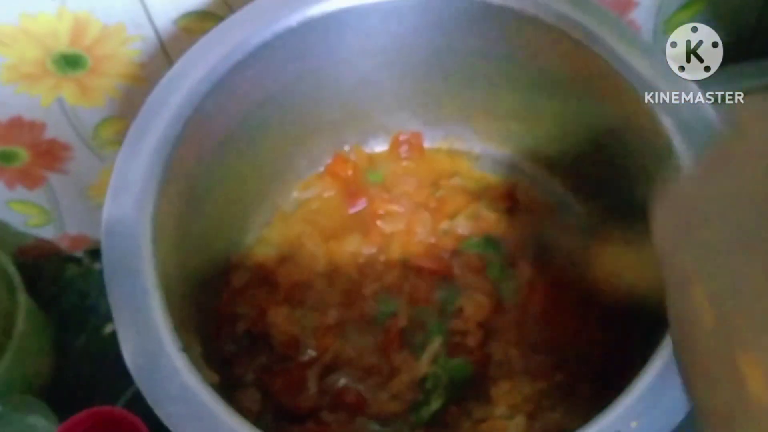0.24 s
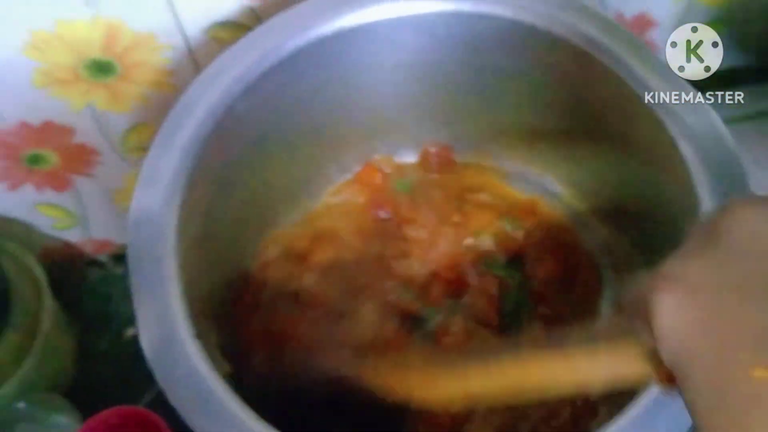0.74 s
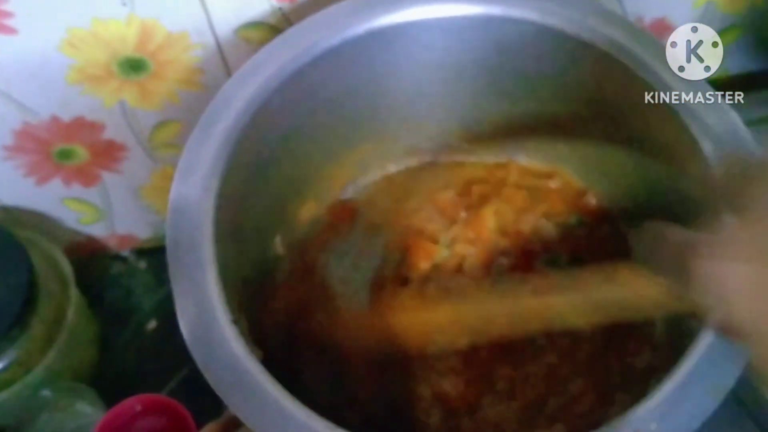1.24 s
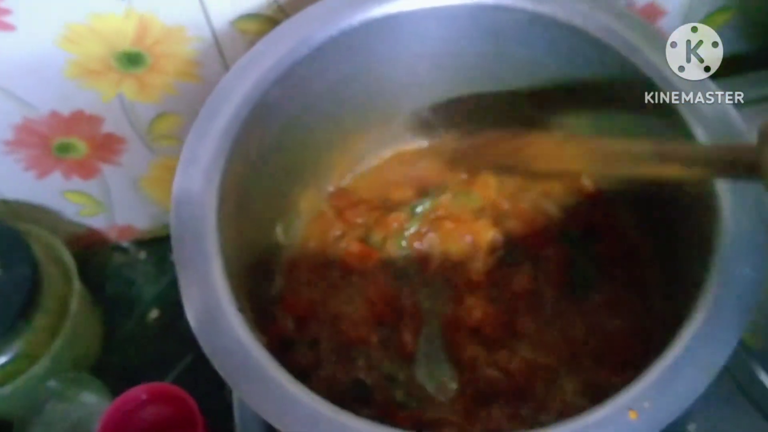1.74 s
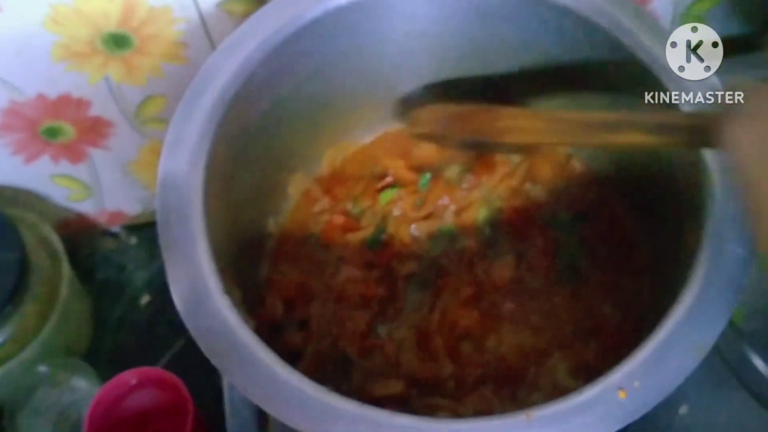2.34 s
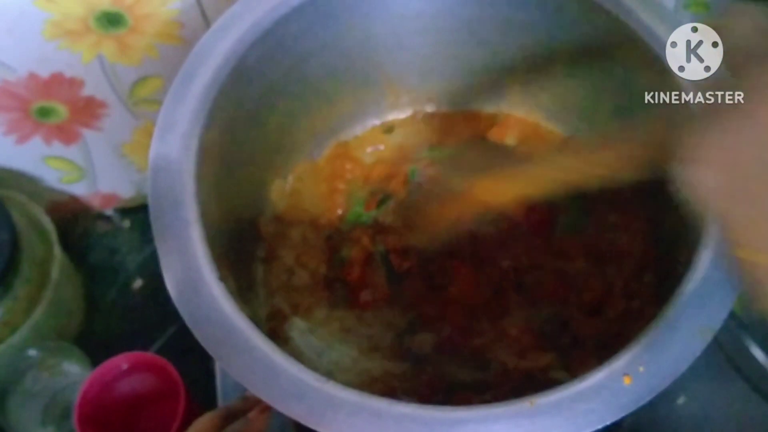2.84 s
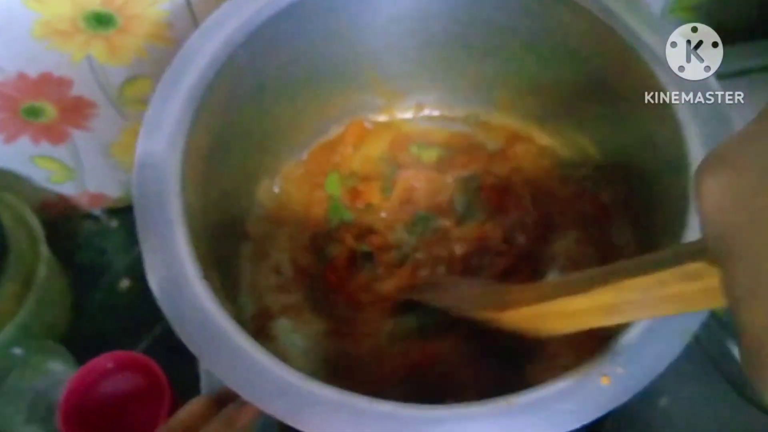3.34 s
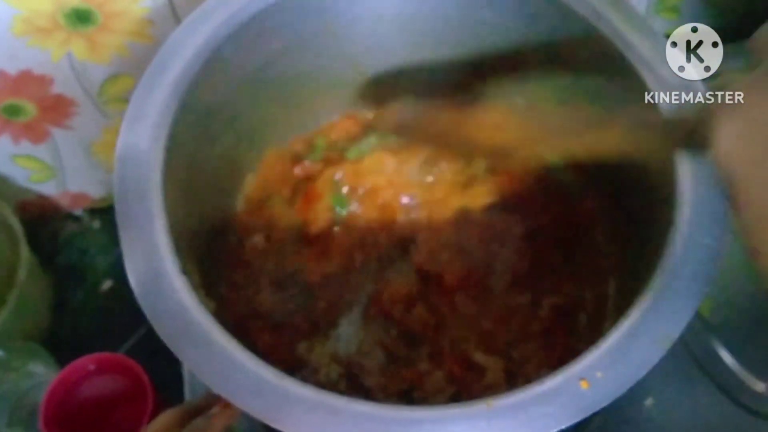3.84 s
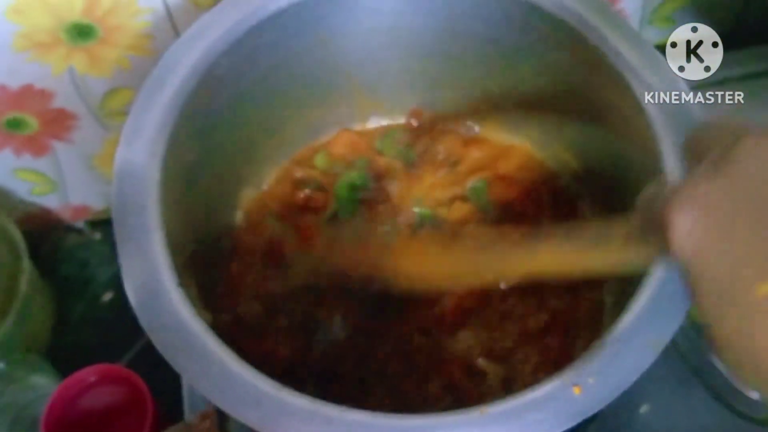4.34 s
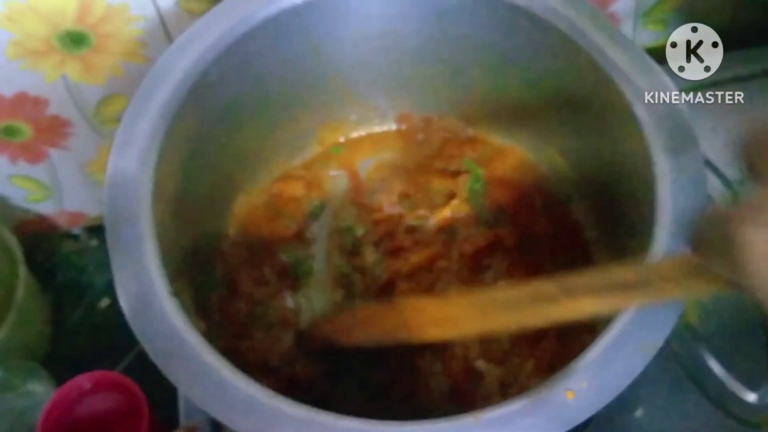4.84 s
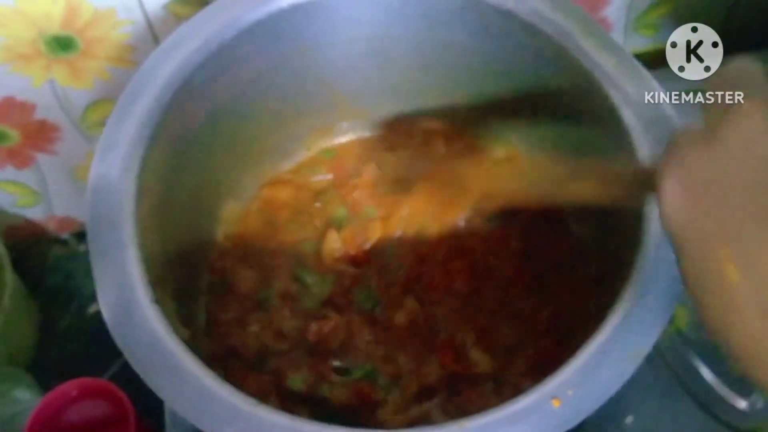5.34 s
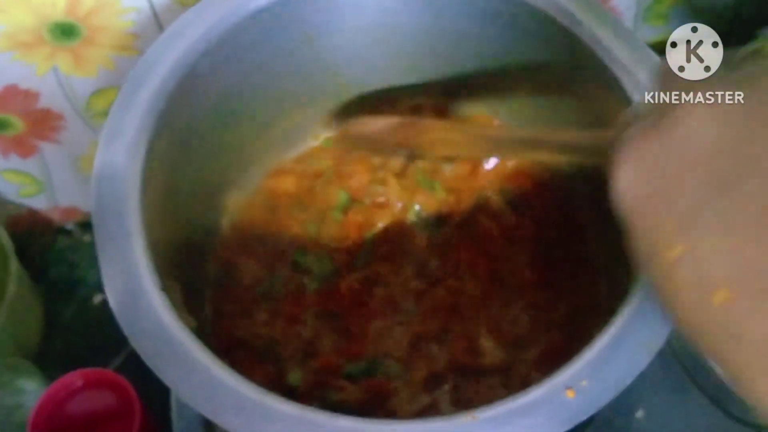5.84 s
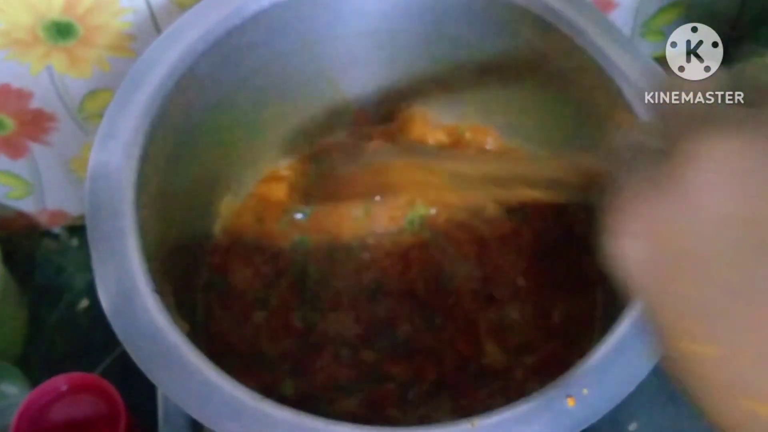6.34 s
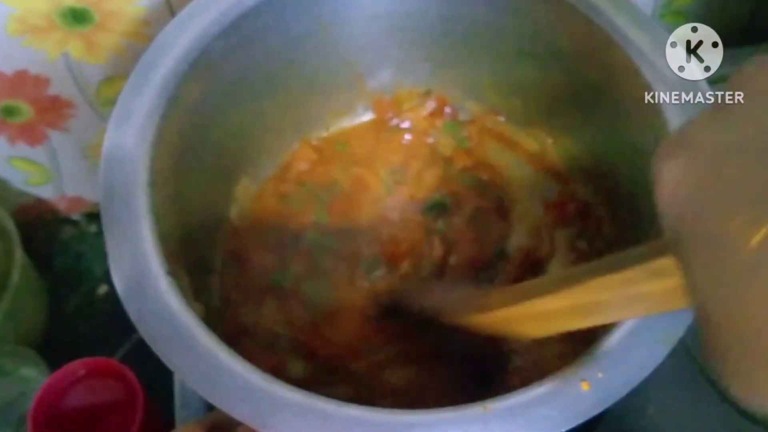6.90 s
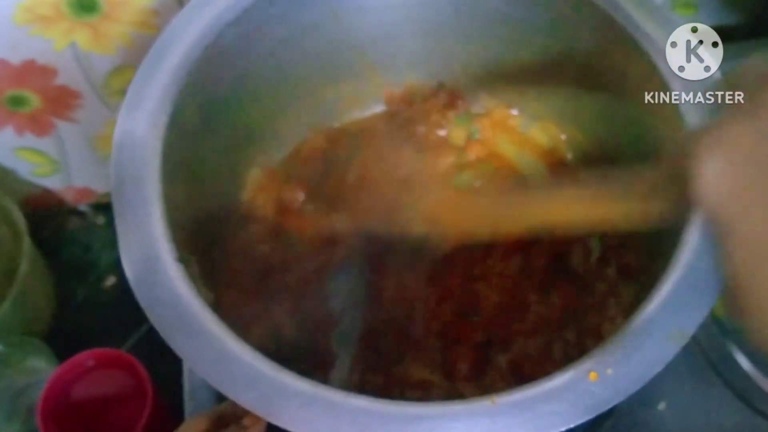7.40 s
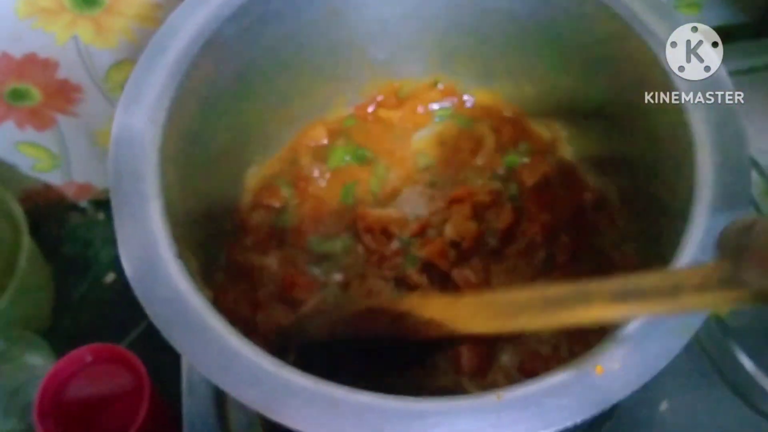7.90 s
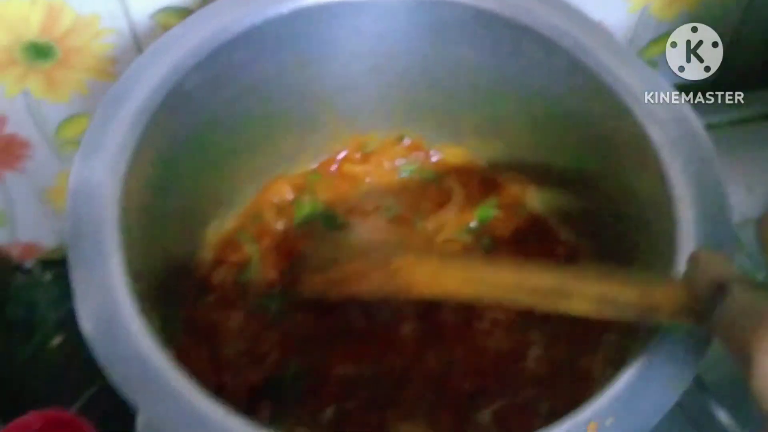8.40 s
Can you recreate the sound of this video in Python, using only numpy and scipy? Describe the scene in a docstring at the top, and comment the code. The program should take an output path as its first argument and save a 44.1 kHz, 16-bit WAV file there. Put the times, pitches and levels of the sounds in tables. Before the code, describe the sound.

A wooden spoon stirs thick masala in a metal pot, close to a hand-held microphone in a small kitchen. A light sizzle and soft squelching run throughout, swelling with strokes two or three times a second over a faint low rumble. A sharp knock rings the pot wall at 0.1 seconds, and the oil spits sharply around 0.4. More ringing knocks come between 0.8 and 1.1 seconds. The pot chatters on its grate with dull thumps around 2 to 2.4 seconds, then knocks follow at 2.6, 3.2 and, more softly, 3.7. From 4 to 6 seconds there are brief spits, muffled thumps and rattles, with a low throb of the swaying stove near 5.4. The sizzle flares around 7 seconds. Loud ringing knocks land at 7.3 and 7.7, with a short rattle between them, and quieter stirring and frying continue until about 8.7 seconds.

```python
"""A wooden spoon stirs thick masala frying in an aluminium pot, close to a hand-held phone.
The spoon sticks and slips through the paste, thumps when loaded and knocks the wall, which rings.
Pushes rock the pot, which chatters on its grate. Steam bubbles sizzle in the oil, flaring with the
strokes, and water drops spit. Under it lie a low handling rumble and the throb of the swaying stove;
the pot and the small kitchen add short echoes."""
import sys
import numpy as np
from scipy import signal
from scipy.fft import rfft, irfft, next_fast_len
from scipy.io import wavfile
from scipy.ndimage import uniform_filter1d

SR = 44100
rng = np.random.default_rng(int(sys.argv[2]) if len(sys.argv) > 2 else 0)


def generate_wav(sig):
    """Save sig (samples, or channels by samples) to the path in sys.argv[1] as 16-bit PCM at SR."""
    pcm = np.round(np.clip(np.atleast_2d(sig).T, -1, 1) * 32767).astype(np.int16)
    wavfile.write(sys.argv[1], SR, pcm)


N = 381906
TIME_S = np.arange(N) / SR
AGE_S = TIME_S[:SR]  # time since a blow
FFT_SIZE = next_fast_len(N + SR // 4)
FREQ_HZ = np.maximum(np.fft.rfftfreq(FFT_SIZE, 1 / SR), 1)


def undb(db):
    """Decibels to gain."""
    return 10 ** (np.asarray(db) / 20)


def unit(x):
    """Scale to rms 1."""
    return x / np.sqrt(np.mean(x ** 2))


def even(x, samples):
    """Hold the running rms near 1."""
    return x / np.sqrt(uniform_filter1d(x ** 2, samples))


def add(out, start_s, sound):
    """Mix a sound in at start_s."""
    start = max(int(start_s * SR), 0)
    out[start:start + len(sound)] += sound[:N - start]


def curve(points):
    """Gain per sample through (s, dB) points."""
    times_s, db = np.transpose(points)
    return undb(np.interp(TIME_S, times_s, db))


def fade(rise_s, t60_s):
    """Envelope of a blow: builds up, then dies away."""
    return (1 - np.exp(-AGE_S / rise_s)) * np.exp(-np.log(1000) * AGE_S / t60_s)


def swells(table, db_column, rest_gain, rise=0.67, fall=1.06):
    """Gain of pushes over a resting gain; rise and fall are shares of each push's length."""
    power = rest_gain ** 2
    for row in table:
        peak_s, length_s = row[:2]
        lag = (TIME_S - peak_s) / length_s
        width = np.where(lag < 0, rise, fall)
        power = power + undb(row[db_column]) ** 2 * np.exp(-(lag / width) ** 2)
    return np.sqrt(power)


def colour(x, points):
    """Filter by a smooth (Hz, dB) spectrum."""
    hz, db = np.transpose(points)
    response = undb(np.interp(np.log(FREQ_HZ), np.log(hz), db))
    return irfft(rfft(x, FFT_SIZE) * response, FFT_SIZE)[:N]


def resonate(x, peaks):
    """Parallel resonators of (Hz, width Hz, dB)."""
    response = sum(undb(db) / (1 + 1j * (FREQ_HZ ** 2 - hz ** 2) / (FREQ_HZ * width_hz))
                   for hz, width_hz, db in peaks)
    return irfft(rfft(x, FFT_SIZE) * response, FFT_SIZE)[:N]


def echoes(x, wet_db, t60_s):
    """Add dense reflections from inside the pot and the near kitchen walls."""
    tail = rng.standard_normal(SR) * fade(0.0014, t60_s)
    tail /= np.sqrt(np.sum(tail ** 2))
    return x + undb(wet_db) * signal.fftconvolve(x, tail)[:N]


def walk(rate_hz):
    """Smooth random wandering, rms 1."""
    hold = max(int(SR / rate_hz), 1)
    steps = np.repeat(rng.standard_normal(N // hold + 1), hold)
    return unit(uniform_filter1d(steps, hold)[:N])


def waver(hz, spread, rate_hz):
    """Tone of rms 1 whose pitch wanders by the share spread."""
    pitch_hz = hz * (1 + spread * walk(rate_hz))
    return np.sqrt(2) * np.sin(2 * np.pi * np.cumsum(pitch_hz) / SR)


def clicks(per_s, spread_db):
    """Random tiny clicks, mostly weak, a few strong; rms 1."""
    size = undb(spread_db * np.minimum(rng.exponential(size=N), 6))
    fires = rng.random(N) < per_s / SR
    return unit(fires * size * rng.choice([-1, 1], N))


def flurries(per_s, spread_db, t60_s):
    """Power of overlapping bursts that start at random and die away; mean 1."""
    starts = np.pad(clicks(per_s, spread_db) ** 2, (SR - 1, 0), "wrap")
    power = np.abs(signal.oaconvolve(starts, fade(0.00099, t60_s) ** 2, "valid"))
    return power / power.mean()


# Handling noise spectrum. Each row: frequency in Hz, relative level in dB.
RUMBLE_SPECTRUM = [(8, -5), (22, 7), (35, 2.5), (50, -8), (64, -5), (80, -8), (100, -6.5), (125, -14.5),
                   (180, -30), (400, -56), (2000, -78)]
# The hand on the phone. Each row: time in seconds, rumble level in dB.
HANDLING_LEVELS = [(0, -56.5), (1.2, -53.5), (2.3, -57.5), (3.1, -55), (3.45, -51), (4.0, -54),
                   (4.7, -51.5), (5.35, -47), (5.8, -51), (6.25, -47), (6.8, -56), (8.66, -57)]
# Hard shoves of the spoon. Each row: peak time in seconds, length in seconds, sway level in dB.
SPOON_SHOVES = [(.12, .05, -49), (.88, 0.12, -50.5), (1.14, .07, -48), (3.41, 0.042, -40.5),
                (3.6, .06, -54), (3.96, 0.081, -50.5), (4.49, 0.18, -47), (5.21, 0.058, -39.5),
                (5.43, 0.065, -34.5), (5.59, .04, -39), (5.72, 0.2, -50), (6.34, 0.07, -45.5)]

def rumble():
    """Handling of the phone rumbles; shoves sway the stove, adding more rumble and a soft throb."""
    noise = even(colour(rng.standard_normal(N), RUMBLE_SPECTRUM), samples=4000)
    sway = swells(SPOON_SHOVES, db_column=2, rest_gain=undb(-66))
    shake = np.hypot(curve(HANDLING_LEVELS), undb(-3) * sway)
    return shake * noise + sway * waver(hz=76, spread=0.0698, rate_hz=37)


# Frying spectrum. Each row: frequency in Hz, gain in dB.
SIZZLE_SPECTRUM = [(1000, -6), (2000, -7), (2600, -3.5), (2900, -0.5), (3300, -10), (4000, -11),
                   (5200, -4.5), (6300, -1.5), (7300, 0), (8100, -2.5), (9000, -12.5), (10000, -14.5),
                   (12000, -9), (15500, -9.5)]
# Steady frying. Each row: time in seconds, level in dB.
SIMMER_LEVELS = [(0, -49.5), (1.3, -49.5), (1.9, -49.5), (5.2, -50.5), (7.9, -50), (8.4, -51.5)]
# Strokes that drag the paste and turn its wet side onto the hot base.
# Each row: peak time in seconds, length in seconds, relative drag level in dB, sizzle flare in dB.
SPOON_STROKES = [(.23, 0.14, -51, -53.5), (.5, 0.077, -52.5, -44), (.95, .15, -57.5, -52.5),
                 (1.33, 0.15, -61, -53), (1.73, 0.075, -57.5, -54), (2.1, 0.11, -49, -57),
                 (2.86, 0.11, -63.5, -50), (3.4, 0.056, -51.5, -45), (3.73, 0.15, -53, -50.5),
                 (4.18, 0.055, -57.5, -52.5), (4.5, 0.12, -56, -64), (4.87, .14, -56.5, -52.5),
                 (5.22, 0.075, -55.5, -68), (5.64, .16, -58.5, -51.5), (6.13, 0.046, -50.5, -50),
                 (6.35, 0.023, -59, -53), (6.88, .1, -58, -54), (7.02, 0.066, -55.5, -43.5),
                 (7.38, 0.18, -63, -54.5), (7.82, 0.077, -48, -60), (8.2, 0.085, -65, -56),
                 (8.65, 0.07, -55, -59)]

def sizzle():
    """Tiny steam bubbles burst in flurries: some span the treble, others keep to one bubble size."""
    broad = flurries(per_s=220, spread_db=2.5, t60_s=0.076)
    edges_hz = np.geomspace(1200, 17000, 9)
    frying = np.zeros(N)
    for band_hz in zip(edges_hz[:-1], edges_hz[1:]):
        power = broad + undb(5.5) * flurries(per_s=300, spread_db=3.0, t60_s=0.064)
        bubbles = clicks(per_s=16000, spread_db=1.2) * np.sqrt(power)
        bandpass = signal.butter(2, band_hz, "band", fs=SR, output="sos")
        frying += signal.sosfilt(bandpass, bubbles)
    steam = swells(SPOON_STROKES, db_column=3, rest_gain=curve(SIMMER_LEVELS))
    return steam * even(colour(frying, SIZZLE_SPECTRUM), samples=11000)


# Squelch spectrum. Each row: frequency in Hz, gain in dB.
PASTE_SPECTRUM = [(90, -5.5), (140, 7.5), (200, -3.5), (330, -1.5), (500, 1), (750, -2), (1100, -4.5),
                  (1600, -8), (2400, -1), (3400, -21), (6000, -18), (16000, -52)]
# Resonances of the pot's air and wall. Each row: frequency in Hz, width in Hz, gain in dB.
HOLLOW_MODES = [(230, 15.5, 7.5), (476, 17, -1), (533, 8.4, 7.5), (897, 45, -8), (1113, 83, 4.5),
                (1510, 44, -0.5), (1930, 91, -2.5), (2740, 28, 3)]

def drag():
    """The spoon sticks and slips through the paste; small squelches sound in the hollow of the pot."""
    slips = clicks(per_s=7000, spread_db=1.0)
    slips *= np.sqrt(flurries(per_s=130, spread_db=3.0, t60_s=0.24))
    squelch = colour(slips, PASTE_SPECTRUM)
    stirring = swells(SPOON_STROKES, db_column=2, rest_gain=undb(-58.5))
    return undb(3.5) * stirring * unit(squelch + resonate(squelch, HOLLOW_MODES))


# Pot wall modes, in six families that ring together.
# Each row of a family: frequency in Hz, relative level in dB, nominal t60 in seconds.
WALL_FAMILIES = [
    [(479, 0, .27), (549, -14, .26)],
    [(1103, 0, .37)],
    [(1141, 0, .33)],
    [(1470.5, 0, .43)],
    [(1601, 0, .42), (1583, -12, .4), (1825, -19, .4)],
    [(2105, -12, .28), (2286, -13, .24), (2500, -16, .22), (2579, -16, .22), (2853, -3, .24),
     (2912, 0, .25), (3030, -9, .2), (3370, -17, .2), (3774, -18, .16), (4030, -13, .14), (5679, -18, .13)],
]
# Spectra of the woody thud and the sharp crack. Each row: frequency in Hz, relative level in dB.
THUD_SPECTRUM = [(60, -22), (140, -11), (195, -18.5), (245, -2.5), (330, -13), (500, -3.5), (650, -4.5),
                 (830, 0), (1200, -1.5), (1700, -3.5), (2500, -8), (4000, -24), (9000, -46)]
CRACK_SPECTRUM = [(300, -5), (1200, -29), (2500, 3.5), (3500, -2.5), (4100, 1.5), (5000, -2), (6200, 3),
                  (8000, -3.5), (9500, -21), (11500, -14.5), (16000, -24)]
# Spoon on the wall. Each row: start in seconds, thud in dB, crack in dB, then ring in dB
# for the families at 480, 1100, 1140, 1470, 1600 Hz and above 2 kHz.
WALL_KNOCKS = [(0.0923, -23.5, -19, -24, -17, -35, -20, -27, -19.5),
               (0.778, -31, -54, -36.5, -38, -35.5, -35, -47, -63),
               (0.976, -30.5, -39, -57, -43.5, -43, -56, -55, -48),
               (1.149, -23.5, -26.5, -25.5, -22, -28, -27, -30, -22.5),
               (2.560, -24.5, -29, -27.5, -39, -27.5, -20.5, -28.5, -27),
               (2.689, -41.5, -29.5, -38, -47, -33, -29.5, -52, -43),
               (3.189, -30, -37.5, -46, -29.5, -37, -43, -32.5, -46),
               (3.7, -48, -38, -45, -56, -64, -65, -50, -62),
               (3.725, -39, -65, -44, -56, -46, -40, -59, -65),
               (7.340, -19, -40, -33, -21, -19.5, -14, -32, -40),
               (7.366, -33, -47, -24.5, -25, -48, -26.5, -53, -44.5),
               (7.718, -29, -31, -29, -23.5, -46, -24.5, -30.5, -30.5)]

def knocks():
    """Each blow thuds, cracks and rings the wall; where it lands decides which modes ring."""
    ring, thud_gain, crack_gain = np.zeros((3, N))
    for start_s, thud_db, crack_db, *ring_db in WALL_KNOCKS:
        for family, family_db in zip(WALL_FAMILIES, ring_db):
            for hz, db, t60_s in family:
                # fast decay, then a faint long tail
                decay = fade(0.0035, 0.81 * t60_s) + 0.13 * fade(0.0034, 2.08 * t60_s)
                tone = np.sin(2 * np.pi * (hz * AGE_S + rng.random()))
                add(ring, start_s, undb(db + family_db) * decay * tone)
        add(thud_gain, start_s, undb(thud_db) * fade(rise_s=0.00044, t60_s=0.13))
        add(crack_gain, start_s, undb(crack_db) * fade(rise_s=0.000081, t60_s=0.11))
    thud = thud_gain * unit(colour(rng.standard_normal(N), THUD_SPECTRUM))
    crack = crack_gain * unit(colour(rng.standard_normal(N), CRACK_SPECTRUM))
    return ring + echoes(thud + crack, wet_db=-14.5, t60_s=0.5)


# Wet paste meets hot metal. Each row: start in seconds, level in dB, centre in Hz, t60 in seconds.
OIL_SPITS = [(.245, -39.5, 6560, 0.086), (.412, -37.5, 2820, 0.11), (0.442, -24, 6740, 0.048),
             (0.45, -34, 7050, 0.26), (2.793, -38, 3680, 0.051), (3.74, -46, 7000, 0.054),
             (4.038, -36, 6400, 0.091), (4.401, -41, 7200, 0.047), (5.635, -29.5, 6360, 0.028),
             (6.965, -45, 6500, 0.063), (7.548, -46, 7500, 0.031), (8.066, -46, 7000, .04),
             (8.125, -46, 6680, .15)]

def spits():
    """Drops of water flash to steam in the oil."""
    out = np.zeros(N)
    for start_s, db, hz, t60_s in OIL_SPITS:
        bubbles = clicks(per_s=16000, spread_db=1.5)
        fizz = unit(resonate(bubbles, [(hz, hz * 0.21, 0)]))
        add(out, start_s, undb(db) * fade(0.001, t60_s) * fizz[:SR])
    return echoes(out, wet_db=-11.5, t60_s=0.21)


# Resonances of base and grate. Each row: frequency in Hz, width in Hz, relative level in dB.
GRATE_MODES = [(128, 12.6, 12), (234, 11.6, 5.5), (542, 12.4, 9), (872, 14, 1), (1340, 140, -3.5),
               (1870, 45, -7), (2250, 110, 3.5), (2740, 55, -9), (3830, 34, -4), (4600, 43, -3),
               (5650, 41, 0.5), (5950, 88, -19), (7100, 140, -4), (8040, 57, -28)]
# Spectrum of the gritty slips. Each row: frequency in Hz, relative level in dB.
GRIT_SPECTRUM = [(60, -2), (130, 3), (330, -8), (550, -5), (1400, -3), (2500, -9.5), (3500, -16),
                 (5000, -16), (6200, -9.5), (8000, -15), (10000, -60), (16000, -31)]
# Pushes that rock the pot. Each row: start in seconds, relative level in dB, number of rocks.
POT_ROCKS = [(0.316, -42, 1), (.84, -39, 2), (1.0, -38.5, 2), (1.284, -41, 1), (1.697, -46, 1),
             (2.014, -33.5, 2), (2.242, -47, 1), (2.278, -39.5, 1), (2.382, -39.5, 2), (4.467, -35, 2),
             (4.571, -35.5, 3), (5.179, -42.5, 1), (5.71, -38, 3), (7.043, -47, 1), (7.372, -36.5, 2),
             (7.472, -35, 1)]

def chatter(period_s=0.05, loss_per_rock_db=3):
    """Each rock of the pot is a short burst of slips that rings base and grate and squeaks faintly."""
    rocking = np.zeros(N)
    for start_s, db, count in POT_ROCKS:
        for k in range(round(count)):
            rock = undb(db - k * loss_per_rock_db) * fade(rise_s=0.0055, t60_s=0.11)
            add(rocking, start_s + k * period_s, rock)
    slips = rocking * clicks(per_s=5000, spread_db=1.0)
    white = rng.standard_normal(N)  # normalises both filters to unit noise gain
    ring = resonate(slips, GRATE_MODES) / np.std(resonate(white, GRATE_MODES))
    grit = colour(slips, GRIT_SPECTRUM) / np.std(colour(white, GRIT_SPECTRUM))
    squeak = undb(-6.5) * waver(hz=4640, spread=0.018, rate_hz=600)
    squeak += undb(-13) * waver(hz=5990, spread=0.02, rate_hz=500)
    return undb(3) * ring + rocking * squeak + undb(2) * echoes(grit, wet_db=-5.5, t60_s=0.23)


# The loaded spoon shakes pot and stove.
# Each row: start in seconds, pitch in Hz, relative level in dB, t60 in seconds.
SPOON_BUMPS = [(0.779, 240, -26.5, 0.097), (1.676, 274, -37, .06), (1.97, 257, -28, 0.052),
               (2.015, 137, -32, 0.16), (3.7, 250, -29, .06), (4.428, 302, -30.5, 0.049),
               (5.144, 105, -30.5, 0.16), (5.149, 200, -36, .09), (5.679, 247, -41, .08),
               (7.342, 246.6, -29, 0.16), (7.492, 124, -39.5, 0.26)]

def bumps():
    """Cushioned by the paste, the spoon only thumps; the sliding load blurs the higher bumps most."""
    out = np.zeros(N)
    for start_s, hz, db, t60_s in SPOON_BUMPS:
        blur = hz / 1400 * walk(rate_hz=hz)[:SR]
        phase = 2 * np.pi * np.cumsum(hz * (1 + blur)) / SR
        add(out, start_s, undb(db + 6.5) * fade(0.18 * t60_s, t60_s) * np.sin(phase))
    return echoes(out, wet_db=-3.5, t60_s=0.23)


# Pushed lumps. Each row: peak time in seconds, half length in seconds, level in dB, centre in Hz.
PASTE_SWISHES = [(1.707, 0.05, -53, 1110), (4.187, 0.021, -51.5, 790), (4.272, 0.029, -44.5, 1620),
                 (4.81, 0.017, -55.5, 915), (4.933, 0.098, -56.5, 990), (6.047, 0.018, -52, 1160),
                 (6.137, 0.044, -66, 1520), (7.046, .05, -48, 1360)]

def swishes():
    """A lump of paste pushed over hot metal crackles and squelches in a soft swell."""
    out = np.zeros(N)
    for peak_s, half_s, db, hz in PASTE_SWISHES:
        bandpass = signal.butter(2, [hz * 0.71, hz * 1.36], "band", fs=SR, output="sos")
        crackle = unit(signal.sosfilt(bandpass, clicks(per_s=2300, spread_db=1.0)))
        swell = np.exp(-((TIME_S - peak_s) / half_s) ** 2)
        out += undb(db) * swell * crackle
    return echoes(out, wet_db=-4.0, t60_s=0.17)


def scene():
    """Everything at the stove, in one channel."""
    return (knocks() + chatter() + bumps() + spits() + sizzle() + swishes() + drag() + rumble())[None]


def record(dry):
    """The phone cuts the top treble steeply."""
    cutoff_hz, ripple_db, stop_db = 15480, 0.2, 70
    lowpass = signal.ellip(12, ripple_db, stop_db, cutoff_hz, fs=SR, output="sos")
    return signal.sosfilt(lowpass, dry)


dry = scene()
out = record(dry)
generate_wav(out)
```